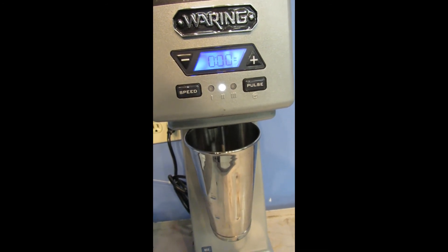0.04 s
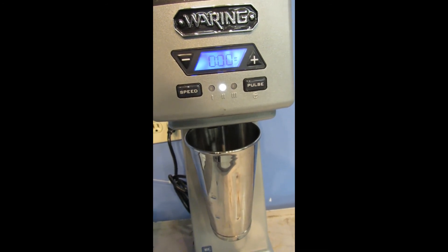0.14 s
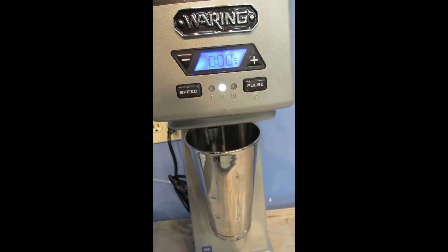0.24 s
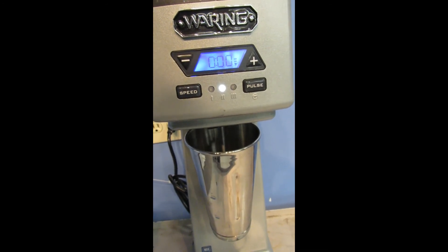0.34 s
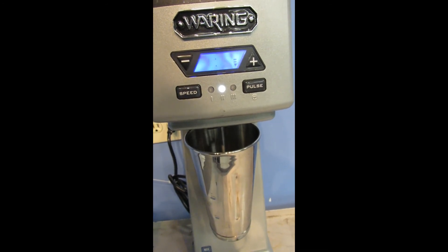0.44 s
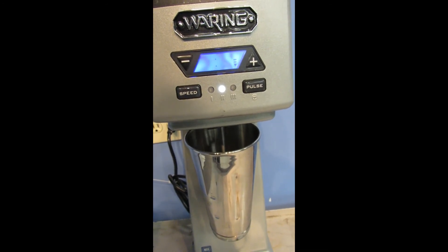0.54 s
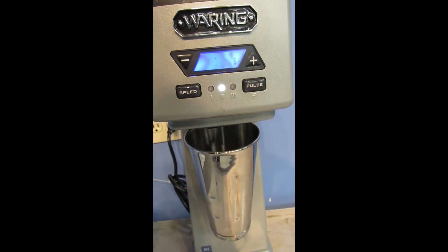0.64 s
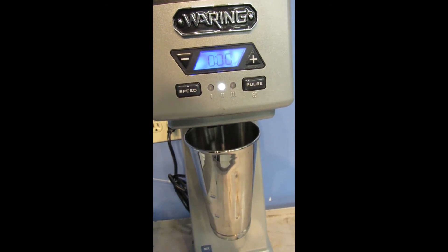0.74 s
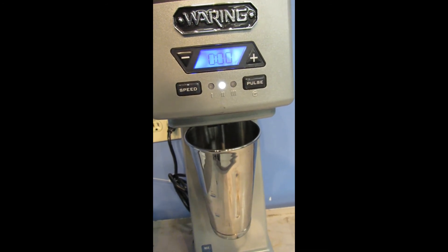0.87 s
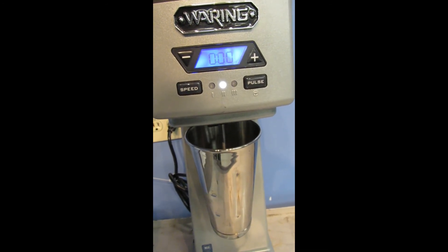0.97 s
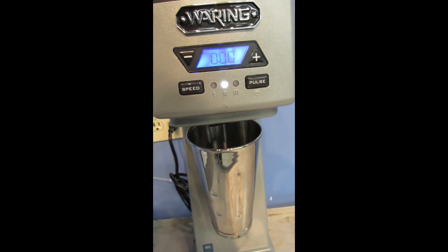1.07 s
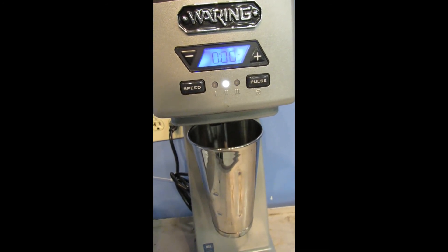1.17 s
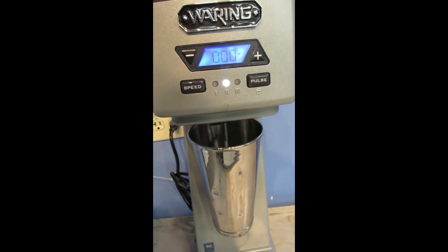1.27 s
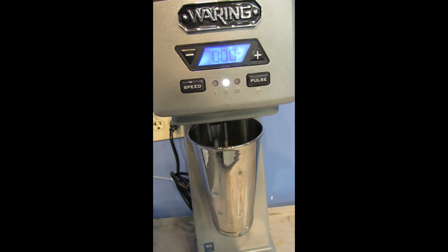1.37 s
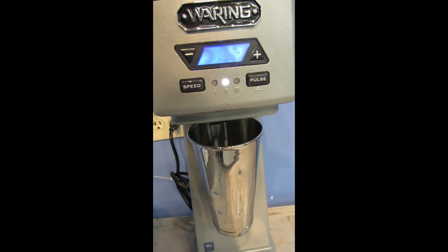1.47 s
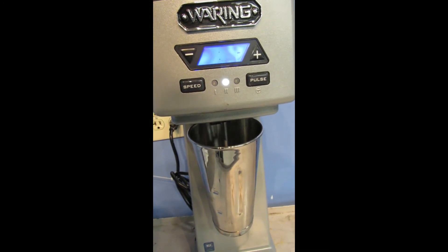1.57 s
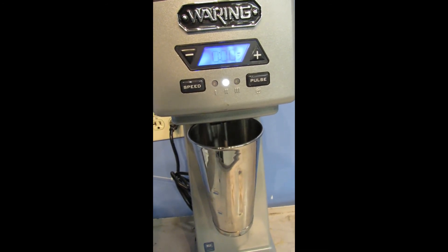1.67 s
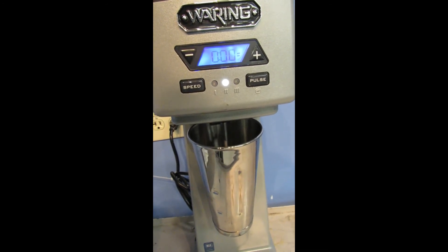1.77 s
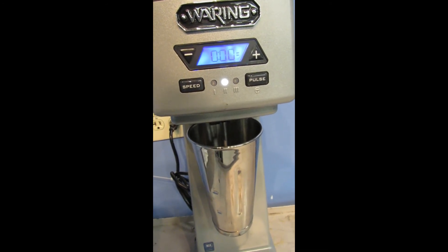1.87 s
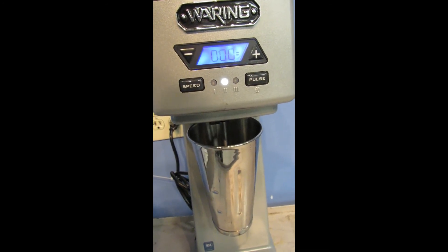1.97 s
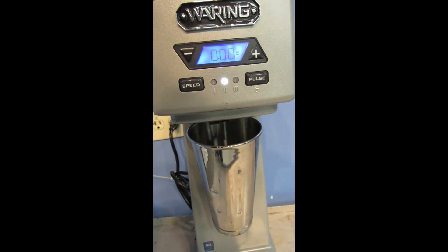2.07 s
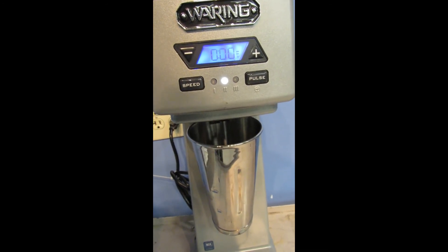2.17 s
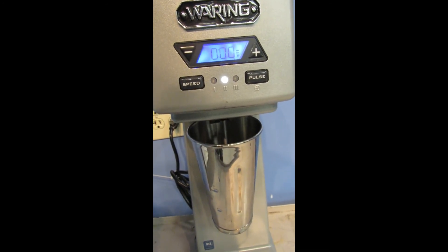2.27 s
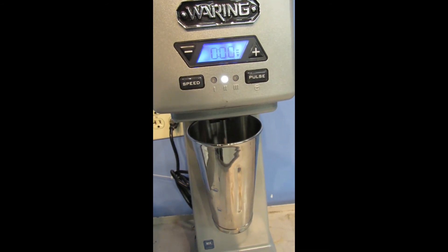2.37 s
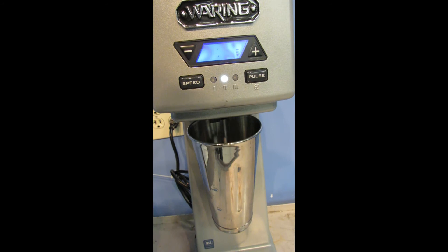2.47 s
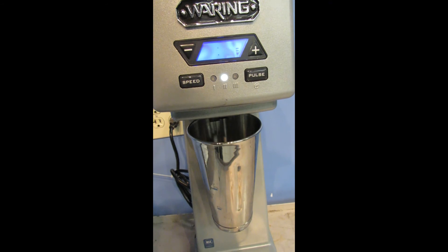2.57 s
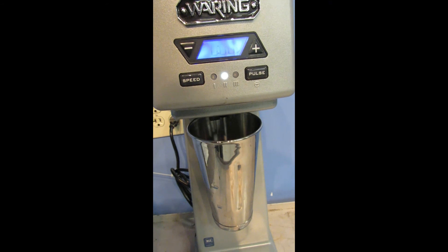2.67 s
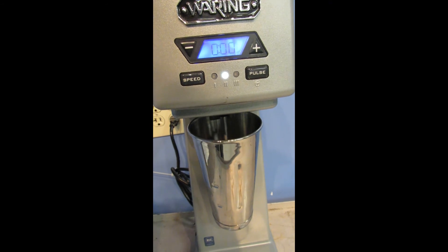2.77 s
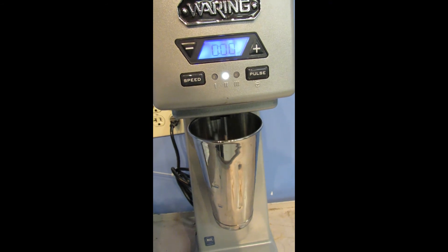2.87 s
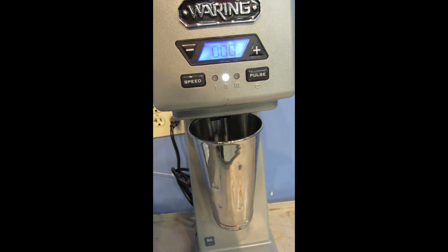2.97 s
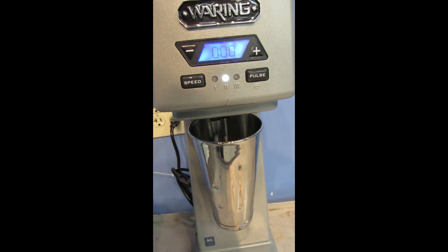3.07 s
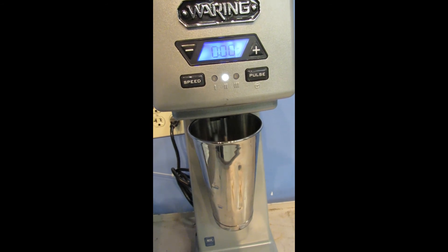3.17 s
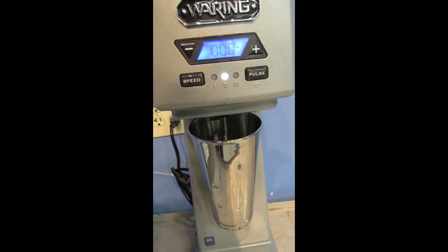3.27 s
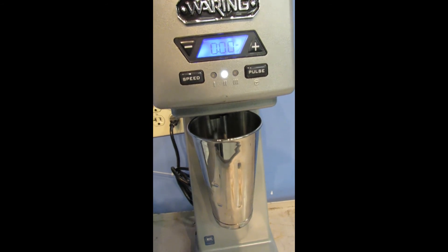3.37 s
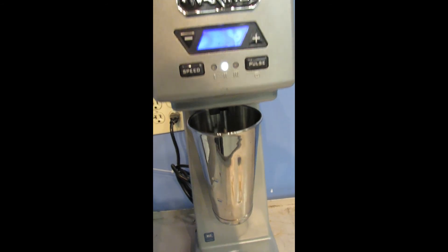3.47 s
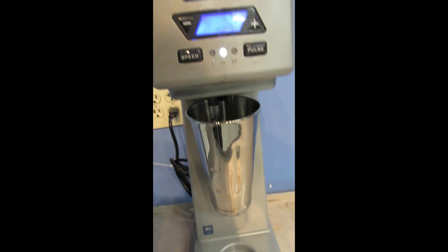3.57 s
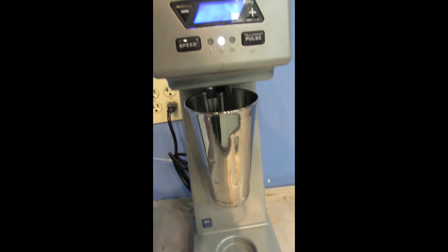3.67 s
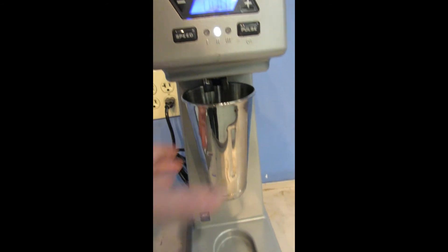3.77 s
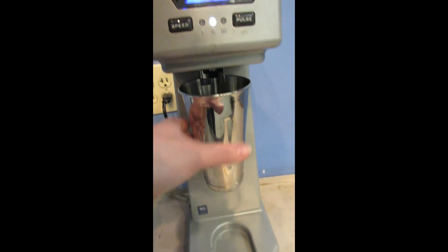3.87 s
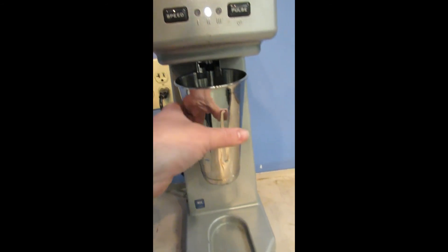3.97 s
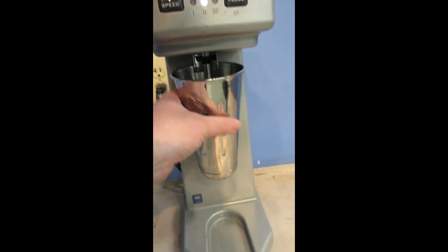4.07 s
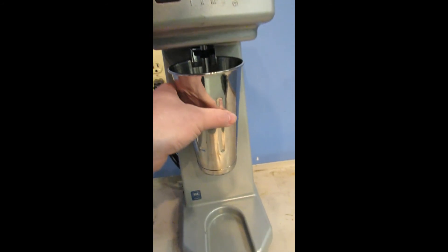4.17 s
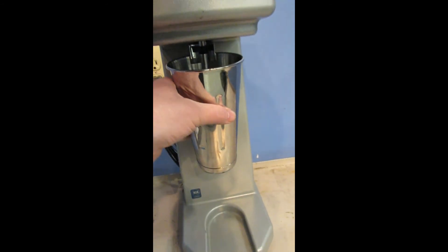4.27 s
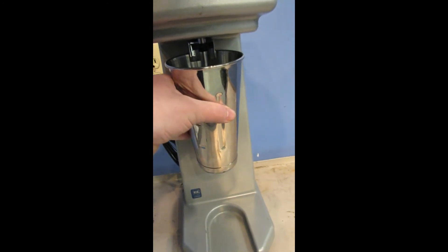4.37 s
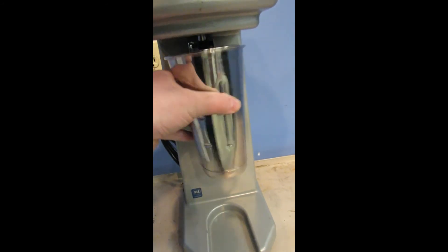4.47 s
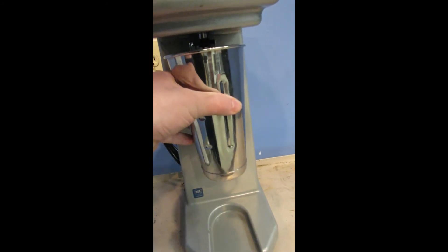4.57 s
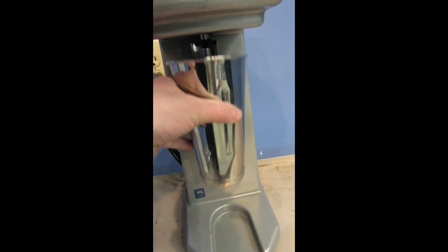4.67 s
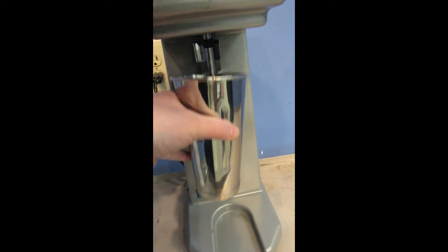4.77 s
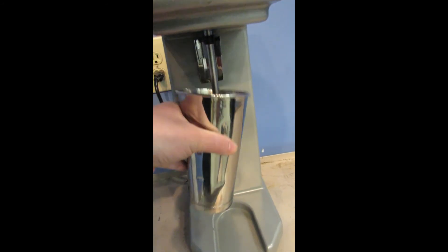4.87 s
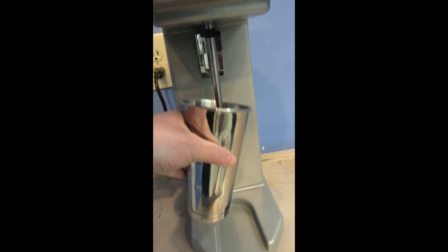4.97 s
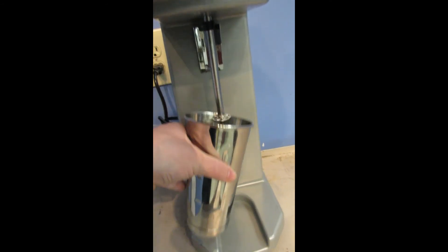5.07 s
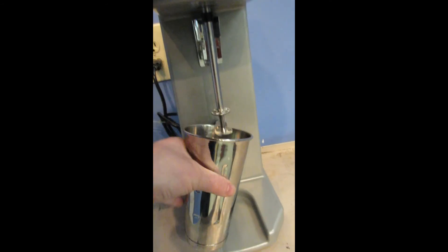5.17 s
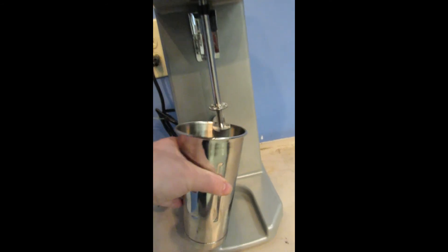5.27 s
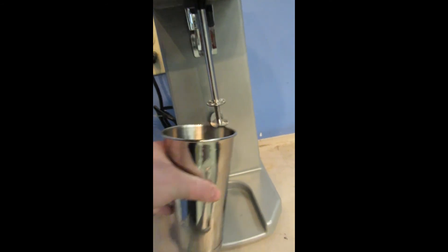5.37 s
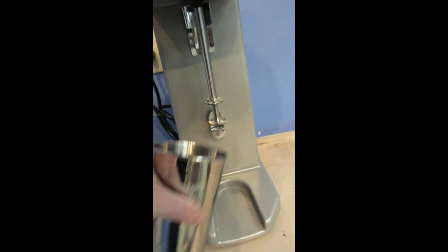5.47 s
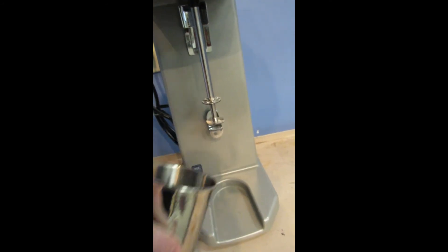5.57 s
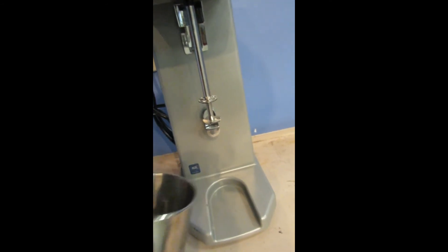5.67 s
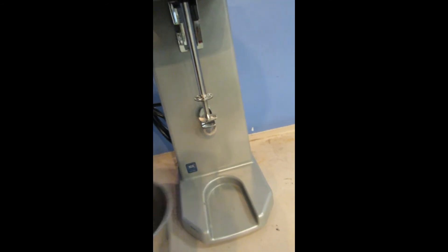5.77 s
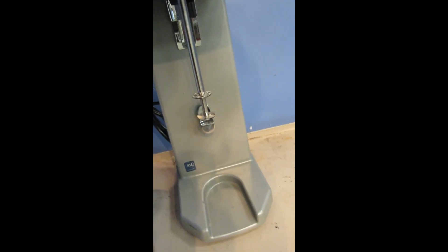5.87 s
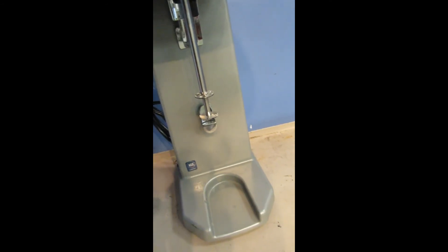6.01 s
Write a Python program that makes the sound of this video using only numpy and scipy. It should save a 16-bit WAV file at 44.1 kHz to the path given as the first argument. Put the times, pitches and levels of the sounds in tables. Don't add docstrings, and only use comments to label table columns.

```python
import sys
import numpy as np
from scipy import signal
from scipy.fft import rfft, irfft
from scipy.io import wavfile
from scipy.ndimage import uniform_filter1d

SR = 44100
rng = np.random.default_rng(int(sys.argv[2]) if len(sys.argv) > 2 else 0)


def level_to_linear(level):
    exponent = np.asarray(level, float) / 20
    return 10 ** exponent


def file_out(sig):
    cols = np.atleast_2d(sig).T
    lim = np.clip(cols, -1, 1)
    pcm = np.round(lim * 32767).astype(np.int16)
    wavfile.write(sys.argv[1], SR, pcm)


N = 266364
T = np.arange(N) / SR

# time in seconds, rattle level in dB.
RATTLE = [(0.0, -27.5), (0.1, -29), (0.182, -28.5), (0.2, -30), (0.274, -25), (0.392, -39.5), (0.43, -21.5),
          (0.482, -44.5), (0.52, -72)]
# frequency in Hz, level in dB, t60 in seconds.
THUMP = [(158, -0.5, 0.58), (274.5, 6.5, 0.52), (352, 9, 0.033), (447, 3, 0.081), (480, -9, 0.24),
         (787, -5.5, 0.35)]
# frequency in Hz, level in dB.
HELD_CUP = [(1050, 2), (1190, 2.5), (1320, 0), (1590, -5.5), (1800, -3), (2105, -2), (2560, 2), (2720, -18),
            (2977, -3.5), (3720, -5), (4210, -7.5), (4700, -2.5), (5400, -6), (6100, -13.5), (6900, -6),
            (7400, -20.5), (8500, -13), (9600, -12)]
# frequency in Hz, gain in dB.
MIC = [(20, -12.5), (100, -7.5), (560, 4), (680, -4), (850, 3.5), (15000, -0.5), (15250, -21),
       (20000, -53.5)]


def evened(x):
    return x / np.sqrt(np.mean(x ** 2) + 1e-20)


def read(points, hz):
    f, value = np.transpose(points)
    return np.interp(np.log(hz + 1), np.log(f + 1), value)


def curves(rows):
    s, *columns = np.transpose(rows)
    since_start = T - s[0] + (s[0] < .01)
    until_end = s[-1] - T + (s[-1] > T[-1] - .01)
    gate = np.clip(np.minimum(since_start, until_end) / .004, 0, 1)
    return [np.interp(T, s, c) for c in columns], gate


def coloured(x, points):
    return irfft(rfft(x) * level_to_linear(read(points, np.fft.rfftfreq(N, 1 / SR))), N)


def resonate(x, hz, width_hz):
    r = np.exp(-np.pi * width_hz / SR)
    return signal.lfilter([1 - r, 0, r - 1], [1, -2 * r * np.cos(2 * np.pi * hz / SR), r * r], x)


def wander(rate_hz):
    size = int(SR / rate_hz)
    return evened(uniform_filter1d(uniform_filter1d(rng.standard_normal(N), size), size))


def grit(spread_db):
    return evened(rng.standard_normal(N) * level_to_linear(spread_db * wander(340)))


def air():
    # frequency in Hz, density in dB per Hz.
    air_hz = [(12, -29), (20, -18.5), (86, -6), (123, -7.5), (150, -10), (241, -6.5), (301, -12),
              (377, -10), (422, -11.5), (542, -15), (678, -28), (1120, -24), (3250, -38.5), (15000, -42),
              (15350, -84.5)]
    # time in seconds, level in dB.
    air_db = [(2.602, -46.5), (3.9, -43.5), (4.6, -43.5), (5.0, -44.5), (5.5, -47.5), (6.04, -56)]
    # frequency in Hz, level in dB.
    hum_tones = [(120, -48.5), (240, -58.5)]
    # frequency in Hz, correlation from 0 to 1.
    likeness = [(60, 0.45), (180, 0.53), (550, 0.14), (1650, 0.32), (4970, 0.53), (15000, 0.22)]
    # frequency in Hz, left minus right in dB.
    air_tilt = [(60, -3.9), (240, -1.5), (950, -2), (3770, 0.8), (15000, -1.5)]
    hz = np.fft.rfftfreq(N, 1 / SR)
    left, other = rfft(rng.standard_normal((2, N)))
    same = np.clip(read(likeness, hz), -1, 1)
    tilt = level_to_linear(read(air_tilt, hz) / 2)
    right = same * left + np.sqrt(1 - same ** 2) * other
    pair = np.array([left * tilt, right / tilt])
    hiss = evened(irfft(pair * level_to_linear(read(air_hz, hz) - read(MIC, hz)), N))
    hum = sum(level_to_linear(db + 0.75 * wander(16)) * np.sin(2 * np.pi * f * T) for f, db in hum_tones)
    s, db = np.transpose(air_db)
    level_db = np.interp(T, s, db)
    return level_to_linear(level_db) * hiss + hum * level_to_linear(level_db - db[0])


def room(x):
    # frequency in Hz, t60 in seconds.
    room_t60 = [(150, 1), (600, 0.4), (2000, 0.077), (6000, 0.025), (14000, 0.033)]
    # frequency in Hz, gain in dB.
    walls = [(100, -24), (400, -14), (1000, -1), (2500, -5.5), (6000, 10.5), (14000, 16)]
    taps = np.zeros((2, SR // 2))
    at = np.arange(100, SR // 2 - 20, 20) + rng.integers(0, 20, (2, (SR // 2 - 101) // 20))
    np.put_along_axis(taps, at, rng.choice([-1., 1.], at.shape), 1)
    hz, t, z = signal.stft(taps, SR, nperseg=256)
    decay = level_to_linear(-60 * t / read(room_t60, hz)[:, None])
    tail = signal.istft(z * decay, SR, nperseg=256)[1]
    tail = tail / np.linalg.norm(tail[0])
    return signal.fftconvolve(coloured(x, walls)[None], tail, axes=1)[:, :N]


def sleeve():
    # centre in seconds, spread in seconds, level in dB.
    swishes = [
        (3.394, 0.035, -56.5),
        (3.801, 0.22, -62.5),
    ]
    # frequency in Hz, density in dB per Hz.
    rustle_hz = [(410, -46), (700, -11), (1250, -2), (2370, -11), (9860, -15), (14400, -26), (16000, -53)]
    # frequency in Hz, density in dB per Hz.
    brush_hz = [(900, -30), (2500, 0.5), (4500, -10), (8500, -1.5), (13000, -8), (16000, -26.5)]
    out = np.zeros(N)
    for (s, spread_s, db), colour in zip(swishes, (rustle_hz, brush_hz)):
        swell = np.exp(-.5 * ((T - s) / spread_s) ** 2)
        out += level_to_linear(db) * swell * evened(coloured(grit(1.5), colour))
    return out


def grip():
    # frequency in Hz, density in dB per Hz.
    grip_hz = [(150, -40), (250, -12.5), (460, 2.5), (674, -22), (1020, -16), (1450, -23), (2490, -18.5),
               (12500, -39.5), (14900, -47.5), (16000, -77)]
    grip_s, rise_s, lift_s, grip_db = 3.93, 0.28, 4.46, -52
    closing = np.clip((T - grip_s) / rise_s, 0, 1) ** 1.1 * np.clip((lift_s - T) / .03, 0, 1)
    return level_to_linear(grip_db) * closing * evened(coloured(grit(1.5), grip_hz))


def bench():
    # frequency in Hz, level in dB, t60 in seconds.
    bench_modes = [(69, -29, 0.33), (188.8, -21, 0.202)]
    since = np.maximum(T - 5.965, 0)
    return sum(level_to_linear(db - 60 * since / t60) * np.sin(2 * np.pi * f * since) for f, db, t60 in bench_modes)


def stroke(start_s, hold_s, db, quick, trail_db, trail):
    after = np.maximum(T - start_s - hold_s, 0)
    release = level_to_linear(-quick * after) + level_to_linear(trail_db - trail * after)
    return level_to_linear(db) * np.clip((T - start_s) / .003, 0, 1) * release


def scrape():
    # hold in seconds, hiss level in dB, cup ring level in dB, low rub level in dB.
    strokes = [(0.053, -62, -38, -66.5), (0.0042, -42.5, -24.5, -28), (.004, -35, -28.5, -34),
               (0.038, -35, -20.5, -24.5), (.015, -54.5, -37.5, -49), (0.11, -40, -36.5, -46.5),
               (.02, -59, -36.5, -42), (0.026, -36, -38.5, -60), (0.0084, -53, -23.5, -47.5),
               (0.0061, -41, -15, -12), (0.0067, -35.5, -18.5, -33), (0.0033, -47, -30.5, -24.5),
               (0.016, -69, -38.5, -29), (0.033, -39.5, -17.5, -17.5)]
    stroke_s = [4.43, 4.474, 4.488, 4.509, 4.585, 4.74, 4.8, 4.86, 4.909, 5.189, 5.319, 5.36, 5.392, 5.965]
    # quick drop in dB/s, trail level in dB, trail drop in dB/s.
    releases = [(800, -17.5, 218), (550, -7.5, 161), (510, -13.5, 130.5)]
    # frequency in Hz, density in dB per Hz.
    scrape_hz = [(1940, -31.5), (3300, -11.5), (4020, -6.5), (5100, -9.5), (6920, -9), (12900, -13),
                 (15300, -24), (16000, -78)]
    # frequency in Hz, density in dB per Hz.
    wall_body_hz = [(500, -28), (850, -1.5), (1200, -1), (1600, -5.5), (2800, -5.5), (4000, -20.5),
                    (8000, -40.5)]
    rub = evened(grit(1.5) * level_to_linear(1.5 * wander(110)))
    modes = []
    for f, db in HELD_CUP:
        swell_db = 5 * wander(40)
        mode = resonate(resonate(rub, f, 50 + .012 * f), f, 900)
        modes.append(level_to_linear(db + swell_db) * evened(mode))
    hiss = evened(evened(coloured(rub, scrape_hz)) + .8 * evened(sum(modes[6:])))
    ring = evened(evened(sum(modes[:6])) + 1.3 * evened(coloured(rub, wall_body_hz)))
    low = evened(sum(level_to_linear(db) * resonate(resonate(rub, f, 86), f, 140) for f, db, _ in THUMP[:4]))
    layers = hiss, level_to_linear(-14.5) * ring, level_to_linear(-7.5) * low
    out = np.zeros(N)
    for k, (layer, release) in enumerate(zip(layers, releases)):
        out += layer * sum(stroke(s, hold_s, db[k], *release) for s, (hold_s, *db) in zip(stroke_s, strokes))
    return out


def knock(crack_db, thump_db, ring_db, hz, thump_hz, t60):
    t, draw = T[:SR // 4], rng.random((2, 24))
    noise = rng.standard_normal(len(t)) * np.minimum(t / .0004, 1)
    crack = resonate(noise * np.exp(-t / 0.0017), 4700, 4300)
    blow = 3.2 * resonate(noise * np.exp(-t / 0.0022), hz, 1100)
    blow += np.exp(-t / 0.00093) * np.sin(2 * np.pi * hz * t)
    thump, ring = np.zeros(len(t)), np.zeros(len(t))
    for k, (f, db, decay_s) in enumerate(THUMP):
        share_db = db - 1.8 * abs(np.log2(f / thump_hz))
        detuned_hz = f * (.96 + 0.11 * draw[0, k])
        thump += level_to_linear(share_db - 60 * t / decay_s) * np.sin(2 * np.pi * detuned_hz * t)
    first_push = 1.5 * np.exp(-t / .004) * np.sin(2 * np.pi * thump_hz * t)
    thump = thump * np.minimum(t / .002, 1) + first_push
    for k, (f, db) in enumerate(HELD_CUP):
        share_db = db - 6 * draw[1, k] - 7 * abs(np.log2(f / hz))
        ring += level_to_linear(share_db - 60 * t / t60 * (f / 2000) ** 0.15) * np.sin(2 * np.pi * f * t)
    ring *= np.minimum(t / .001, 1)
    return level_to_linear(crack_db - 2.5) * crack + level_to_linear(thump_db - 6.0) * thump + level_to_linear(ring_db) * (blow + 0.29 * ring)


def knocks():
    # start in seconds, crack in dB, stand thump in dB, cup ring in dB, thump centre in Hz.
    wall_knocks = [
        (4.262, -55.5, -40.5, -39.5, 275),
        (4.4437, -44, -40.5, -47, 552),
        (4.4674, -42, -37, -42.5, 428),
        (4.4806, 3.5, -30.5, -11.5, 337.5),
        (4.509, -12, -25, -23, 277),
        (4.9075, -41.5, -35.5, -25.5, 267),
        (5.1879, -24, -28, -5.5, 477),
        (5.9646, -31, -17.5, -12, 287),
    ]
    # start in seconds, crack in dB, stand thump in dB, cup ring in dB, thump centre in Hz.
    rim_knocks = [
        (4.7422, -31, -41, -35.5, 288),
        (5.3188, -38, -27.5, -19, 505),
        (5.3599, -21, -33.5, -24, 247),
    ]
    out = np.zeros(N)
    for rows, hz, t60 in ((wall_knocks, 1150, .05), (rim_knocks, 2700, .13)):
        for s, crack_db, thump_db, ring_db, thump_hz in rows:
            part = out[round(s * SR):][:SR // 4]
            part += knock(crack_db, thump_db, ring_db, hz, thump_hz, t60)[:len(part)]
    return out


def handling():
    # frequency in Hz, gain in dB.
    hand_hz = [(50, -14), (150, -1)]
    return coloured(knocks() + scrape() + sleeve(), hand_hz) + bench() + grip()


def rattle(turn):
    # frequency in Hz, width in Hz, level in dB.
    cup_modes = [(980, 118, 2), (1330, 40, 1), (1590, 52, 7.5), (1890, 103, 5.5), (2568, 35, 11.5),
                 (2813, 54, 11.5), (4080, 800, -7), (4600, 27, 1.5), (5070, 12, -2), (5800, 52, -6.5),
                 (6300, 300, -12), (7090, 16, 1), (7530, 74, -15), (8600, 200, -15.5)]
    (rattle_db,), gate = curves(RATTLE)
    at = np.flatnonzero(np.diff(np.floor(turn / (2 * np.pi))))
    at = at[at < SR]
    period, draw = np.gradient(at), rng.standard_normal((300, 2))[:len(at)].T
    late_turns = .032 * (-1) ** np.arange(len(at)) + .005 * draw[0]
    taps = np.zeros(N)
    taps[np.round(at + period * late_turns).astype(int)] = level_to_linear(0.34 * draw[1])
    drive = evened(taps[:SR]) + .6 * grit(3.0)[:SR]
    cup = np.zeros(SR)
    for k, (f, width_hz, db) in enumerate(cup_modes):
        seat_db = 2 * wander(25)[:SR]
        upper_db = (f > 2200) * -1.9
        cup += (-1) ** k * level_to_linear(db + seat_db + upper_db) * resonate(drive, f, 1.07 * width_hz)
    return gate * level_to_linear(rattle_db) * np.pad(evened(cup + 0.0067 * drive), (0, N - SR))


def shaft():
    # time in seconds, turns in Hz.
    shaft_hz = [(0.0, 273.8), (0.45, 227), (0.95, 173), (1.45, 123.5), (1.95, 84), (2.45, 49.5), (3.0, 8.4)]
    (hz,), running = curves(shaft_hz)
    hz = uniform_filter1d(hz, SR // 4, mode="nearest")
    return 2 * np.pi * np.cumsum(hz) / SR, hz, running


def brushes(turn, speed):
    # frequency in Hz, density in dB per Hz.
    whirr_hz = [(88, -71), (150, 1), (466, -14.5), (675, -29.5), (1040, -12), (1420, -29), (1600, -31),
                (1760, -22), (3040, -23), (3350, -25), (4240, -23), (5050, -26), (8900, -28.5),
                (15200, -37), (16000, -62)]
    # frequency in Hz, width in Hz, level in dB.
    whirr_rings = [(1050, 40, -23.5), (1574, 95, 19.5), (1895, 51, 6), (2415, 400, 5), (3090, 40, 6),
                   (4150, 60, 3), (4700, 180, -9), (8650, 300, -5), (9280, 220, 1.5)]
    (rattle_db,), rattling = curves(RATTLE)
    level = level_to_linear(-36) * speed ** 1.69 + rattling * level_to_linear(rattle_db - 14)
    hiss = grit(0.81) * (1 + 0.057 * np.cos(turn))
    rings = sum(level_to_linear(db) * resonate(hiss, f, width_hz) for f, width_hz, db in whirr_rings)
    return level * evened(coloured(hiss + rings, whirr_hz))


def commutator(turn, hz, speed):
    # multiple of the turns, level in dB.
    bars = [(24, -49), (48, -56), (72, -59), (96, -63), (120, -65), (144, -67), (168, -70)]
    # frequency in Hz, gain in dB.
    vent = [(1000, -18), (2000, -11), (2500, 5), (3400, -2), (4200, 1), (4700, 2), (5100, -10), (5900, -2),
            (6800, -7), (8000, 0), (10500, 0), (12000, -3), (14500, 3), (16000, -2)]
    fading = speed ** .8 * np.clip((speed - .2) / .14, 0, 1)
    out = np.zeros(N)
    for k, db in bars:
        heard = level_to_linear(read(vent, k * hz)) * (k * hz < .38 * SR)
        flutter_db, slip = 3 * wander(14), 1.2 * wander(120)
        out += level_to_linear(db + flutter_db) * fading * heard * np.sin(round(k) * turn + slip)
    return out


def orders(turn, hz, speed):
    # multiple of the turns, level at full speed in dB.
    order_db = [(3, -37.5), (4, -39.5), (5, -40.5), (6, -40), (7, -46.5), (8, -43)]
    # frequency in Hz, width in Hz, gain in dB.
    stand_modes = [(145.4, 22, 21.5), (247, 78, 15), (407, 37, 11), (478, 23.7, 9), (540, 15, -1),
                   (740, 75, -12), (1123, 180, -2.5)]
    out = np.zeros(N)
    for k, db in order_db:
        stand = sum(level_to_linear(g) / (1 + (2 * (k * hz - f) / width_hz) ** 2) for f, width_hz, g in stand_modes)
        level = level_to_linear(db + 2.5 * wander(43)) * speed ** 1.6
        out += level * stand * np.sin(round(k) * turn + .5 * wander(53))
    return out


def unbalance(turn, hz, speed):
    # frequency in Hz, width in Hz, unbalance level in dB, twice-a-turn pull level in dB.
    base_modes = [(103, 8.8, -30, -51.5), (120.2, 1.7, -33.5, -43.5), (143.7, 4.4, -40.5, -44.5),
                  (154, 4, -15.5, -25), (169.87, 3.4, -23.5, -51), (175.4, 5.8, -35, -51),
                  (202, 16, -30.5, -39.5), (238.4, 3.5, -21, -29.5), (253.8, 5.2, -12, -34),
                  (277.1, 8, -7.5, -33), (302, 25, -47, -41), (404.4, 26, -47.5, -31.5),
                  (461, 14, -45, -32.5), (577, 59, -41, -31.5)]
    faint_below_hz = 102
    once = np.sqrt(2) * np.sin(turn) / (1 + (faint_below_hz / hz) ** 10)
    twice = np.sqrt(2) * np.sin(2 * turn) / (1 + (faint_below_hz / (2 * hz)) ** 10)
    out = np.zeros(N)
    for f, width_hz, db, pull_db in base_modes:
        out += level_to_linear(db) * resonate(once + level_to_linear(pull_db - db) * twice, f, width_hz)
    return out * level_to_linear(3 * wander(22) * (1.69 - speed))


def motor(turn, hz, running):
    speed = hz / hz[0]
    tones = unbalance(turn, hz, speed) + orders(turn, hz, speed) + commutator(turn, hz, speed)
    return running * (tones + brushes(turn, speed))


def scene():
    # frequency in Hz, left minus right in dB.
    motor_tilt = [(60, 7), (180, -4), (550, -1), (1650, 1.5), (4970, 0), (15000, 1.5)]
    turn, hz, running = shaft()
    mixer = motor(turn, hz, running) + rattle(turn)
    hand = handling()
    left = coloured(mixer, [(f, db / 2) for f, db in motor_tilt])
    right = coloured(mixer, [(f, -db / 2) for f, db in motor_tilt])
    direct = np.array([left, right]) + hand * level_to_linear(np.array([[.3], [-.3]]))
    return direct + room(level_to_linear(-9.5) * mixer + level_to_linear(-14) * hand) + air()


def roll_off(x):
    return signal.sosfilt(signal.butter(12, 16290, fs=SR, output="sos"), x)


def record(dry):
    overloaded = 1.553 * np.tanh(dry / 1.079)
    heard = np.array([coloured(x, MIC) for x in overloaded])
    return roll_off(np.clip(heard, -.94, .94))


dry = scene()
out = record(dry)
file_out(out)
```